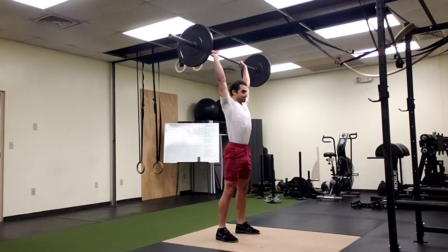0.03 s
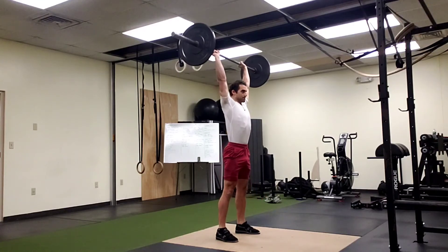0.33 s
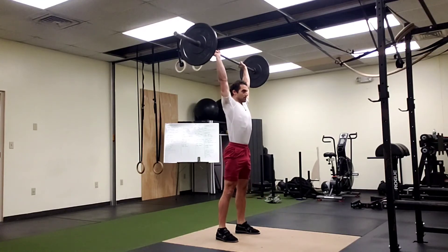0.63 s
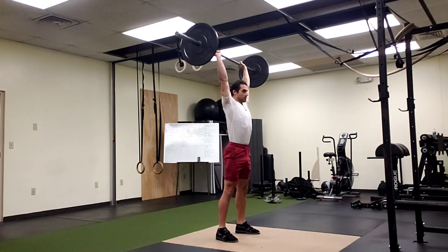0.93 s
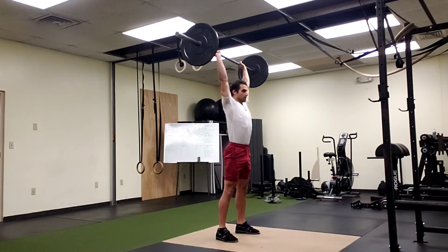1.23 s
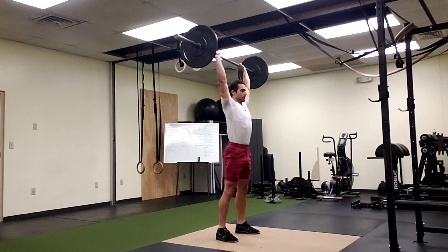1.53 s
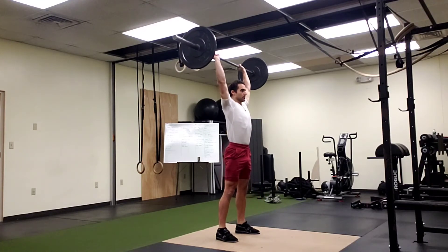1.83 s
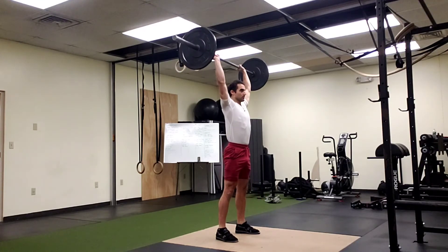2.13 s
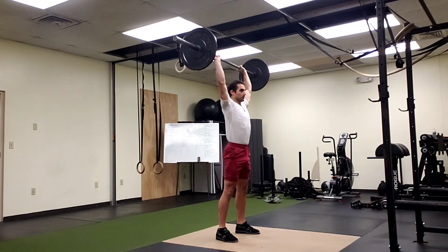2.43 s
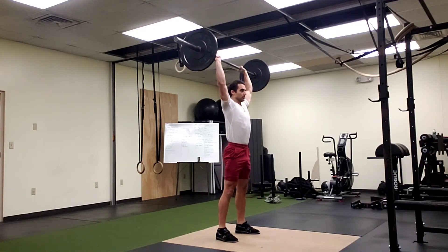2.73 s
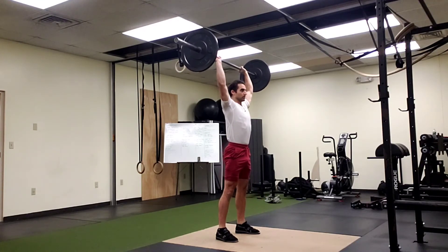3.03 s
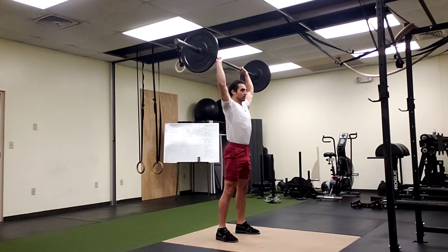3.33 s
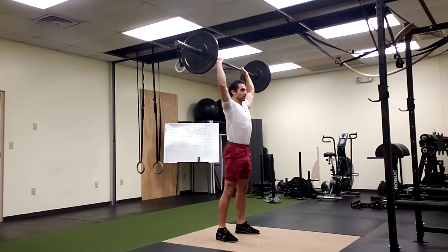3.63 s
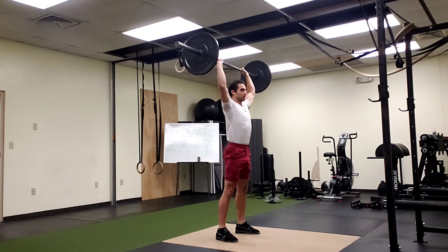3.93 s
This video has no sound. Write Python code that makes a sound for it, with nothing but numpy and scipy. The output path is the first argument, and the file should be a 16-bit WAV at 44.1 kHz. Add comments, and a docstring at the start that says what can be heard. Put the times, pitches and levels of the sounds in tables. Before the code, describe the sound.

A loaded barbell gives one sharp, rattling metal clang that echoes briefly around a gym. Quiet ventilation rumbles and hums throughout with faint microphone hiss, and a single electrical click comes late.

```python
"""In a gym, the plates of a barbell clash as it is locked overhead. They knock on the ends of the bar
a few times in quick succession, the steel rings, and the clang dies away in the room.
Air rumbles in the ventilation ducts and the fan hums throughout, over faint microphone hiss
and a thin sizzle on the left. Late on there is one dry electrical click."""
import sys
import numpy as np
from scipy import signal
from scipy.fft import rfft, irfft
from scipy.io import wavfile
from scipy.ndimage import uniform_filter1d

SR = 44100
rng = np.random.default_rng(int(sys.argv[2]) if len(sys.argv) > 2 else 0)


def unload_wav(signal):
    """Save mono or channel-first audio to the path in sys.argv[1] as 16-bit WAV at rate SR, clipped to [-1, 1]."""
    wavfile.write(
        sys.argv[1],
        SR,
        np.round(np.clip(np.atleast_2d(signal).T, -1, 1) * 32767).astype(np.int16),
    )


N = 176400  # 4 seconds

# plates knocking on the ends of the bar (time [s], level [dB], dull above [Hz])
KNOCKS = [(0.0, -46, 22000), (0.013, -54, 2000), (0.053, -54, 4830), (0.085, -58.5, 3000)]
# tone colour of the clattering plates (frequency [Hz], relative level [dB])
CLATTER_COLOUR = [(200, -1), (600, -2.5), (1100, .3), (1750, -3.2), (2150, 2.3), (3100, -1.5), (3950, 2.6),
                  (5050, -5.5), (5380, 4), (5800, -2), (7500, -3.5), (8600, -11), (9600, -3.5),
                  (11500, -1.5), (14500, -6.5)]
# which side the clang leans to (frequency [Hz], left minus right [dB])
CLANG_SIDE = [(600, 3), (2300, 1.4), (4200, -2), (5400, -2.5), (6500, 1), (8000, -8.5), (9600, 1.5),
              (12000, -.5), (14500, 0)]
# how long the gym echoes (frequency [Hz], time to fade by 60 dB [s])
GYM_ECHO = [(250, .6), (1000, 0.47), (2300, 0.62), (4000, 0.57), (6200, .68), (14000, 0.57)]
# ringing tones of the steel (frequency [Hz], relative level [dB], time to fade by 60 dB [s])
STEEL_TONES = [(1254, -13, .55), (1526, -15, .55), (2122, -10.5, .6), (2192, -13, .65), (2325, -10, .65),
               (2470, -13, .5), (3174, -14, .54), (3705, -10, .45), (3805, -14, .5), (3908, -10, .45),
               (4302, -12, .45), (5309, -1, .46), (5353, -7, .5), (5410, -4, .52), (5516, -8.5, .55),
               (7210, -16, .5)]
# tone colour of the moving air (frequency [Hz], relative level [dB])
AIR_COLOUR = [(15, -33), (28, -23.5), (38, -8.5), (48, -5.5), (58, -1.5), (68, -7), (84, -8.5),
              (100, -16.5), (150, -22.5), (185, -21), (250, -27.5), (380, -30), (460, -34.5), (530, -41),
              (660, -40.5), (850, -50), (1200, -54), (1900, -59), (2500, -58), (3200, -68), (5000, -73),
              (14000, -89.5)]
# how alike the air sounds in both ears (frequency [Hz], likeness [0-1])
AIR_LIKENESS = [(60, 1), (130, 0.94), (280, 0.85), (450, 0.66), (700, .45), (1300, 0.085), (4000, .1)]
# fan and motor tones (frequency [Hz], level [dB], waver [0-1])
FAN_TONES = [(59.22, -47.8, 0.56), (179.2, -66, .55), (419.2, -76, .65), (478.5, -82.5, .4), (931, -94, .7)]
# tone colour of the microphone hiss (frequency [Hz], relative level [dB])
HISS_COLOUR = [(500, 1), (1500, -1), (2500, 1.5), (3500, 0.5), (5000, -1), (7000, -4), (8000, -13),
               (8900, -12), (10000, -5), (11500, 0.5), (14500, 0)]
# how the sizzle comes and goes (time [s], level [dB])
SIZZLE_LEVELS = [(.5, -98), (.75, -87), (1.25, -87.5), (1.45, -96), (1.7, -87), (1.87, -91), (2.0, -86.5),
                 (2.45, -85.5), (2.55, -91), (2.7, -85), (2.85, -93), (3.18, -85), (3.3, -94), (3.48, -93),
                 (3.62, -83.5), (3.95, -96)]

VENT_PAN_DB = 1.6  # air and fan lean a little to the left


def amp(db):
    """Turns decibels into a number to multiply a sound by."""
    return 10 ** (np.asarray(db) / 20)


def unit(x):
    """Scales a signal to an average (rms) strength of 1."""
    return x / np.sqrt(np.mean(abs(x) ** 2) + 1e-20)


def read(table, hz):
    """Looks up a value between a table's rows, on a pitch-like (log) scale."""
    row_hz, value = np.transpose(table)
    return np.interp(np.log(hz + 1), np.log(row_hz + 1), value)


def pan(db):
    """Left and right gains that make the left louder by db."""
    return amp(np.array([[.5], [-.5]]) * db)


def add(mix, start_s, sound):
    """Adds a stereo sound to the mix at the given time."""
    part = mix[:, max(round(start_s * SR), 0):][:, :sound.shape[1]]
    part += sound[:, :part.shape[1]]


def drift(rate_hz):
    """A slow random wobble of strength 1, as complex numbers."""
    hz = np.fft.fftfreq(N, 1 / SR)
    keep_slow = np.exp(-.5 * (hz / rate_hz) ** 2)
    return unit(np.fft.ifft(np.fft.fft(rng.standard_normal(N)) * keep_slow))


def shaped_noise(gain):
    """Stereo noise, coloured by one gain for each frequency."""
    return unit(irfft(rfft(rng.standard_normal((2, N))) * gain, N))


def plate_knock(dull_hz, crack_db=-3, crack_fade_s=.011):
    """A plate makes contact with a short crack, then its clatter fades with the room's echo."""
    t = np.arange(SR) / SR
    hz, times, bands = signal.stft(rng.standard_normal((2, SR)), SR, nperseg=512)
    treble_cut = 1 / (1 + (hz / dull_hz) ** 4)
    bands *= (amp(read(CLATTER_COLOUR, hz)) * pan(read(CLANG_SIDE, hz)) * treble_cut)[:, :, None]
    steady = signal.istft(bands, SR)[1][:, :SR]
    fade = amp(-60 * times / read(GYM_ECHO, hz)[:, None])
    clatter = signal.istft(bands * fade, SR)[1][:, :SR] / steady.std()
    # reversed, so the crack's noise is unlike the clatter's
    crack = amp(crack_db) * unit(steady[:, ::-1]) * np.exp(-t / crack_fade_s)
    return crack + clatter


def steel_ring(gain_db=-10, flutter_depth=.5, flutter_hz=14):
    """Each knock feeds the steel's tones; reflections make them flutter differently in each ear."""
    t, out = np.arange(SR) / SR, np.zeros((2, SR))
    for hz, db, fade_s in STEEL_TONES:
        energy = sum((t >= start_s) * amp(knock_db + db - 60 * abs(t - start_s) / fade_s) ** 2
                     for start_s, knock_db, _ in KNOCKS)
        flutter = 1 + flutter_depth * drift(flutter_hz)[:2 * SR].reshape(2, SR)
        cycles = hz * t + rng.random() + rng.random((2, 1)) / 2
        tone = (flutter * np.exp(2j * np.pi * cycles)).real
        out += np.sqrt(energy) * pan(read(CLANG_SIDE, hz)) * tone
    return amp(gain_db) * out


def barbell():
    """The plates hit, then settle with weaker, duller knocks, and the steel rings on."""
    out = np.zeros((2, N))
    for start_s, db, dull_hz in KNOCKS:
        add(out, start_s, amp(db) * plate_knock(dull_hz))
    add(out, 0, steel_ring())
    return out


def ventilation(level_db=-45.5, patchy_db=1.0, swell_db=.5):
    """Air rumbles and rushes through ducts; its deep part is alike in both ears."""
    hz, _, bands = signal.stft(rng.standard_normal((2, N)), SR, nperseg=8192)
    likeness = read(AIR_LIKENESS, hz)[:, None]
    bands[0] = likeness * bands[1] + np.sqrt(1 - likeness ** 2) * bands[0]
    # neighbouring frequencies rise and dip together at random
    patches = unit(uniform_filter1d(rng.standard_normal(bands.shape[1:]), size=40, axis=0))
    bands *= amp(read(AIR_COLOUR, hz)[:, None] + patchy_db * patches)
    air = signal.istft(bands, SR)[1][:, :N]
    swell = amp(swell_db * drift(rate_hz=2).real)
    return amp(level_db) * pan(VENT_PAN_DB) * unit(air * swell)


def fan_hum(swell_at_s=1, swell_width_s=.052, swell_hz=420, swell_db=-64.5):
    """The fan and its motor hum with wavering tones; one tone stands out for a moment."""
    t, hum = np.arange(N) / SR, np.zeros(N)
    for hz, db, waver in FAN_TONES:
        wobble = 1 - waver + waver * drift(rate_hz=7)
        tone = np.exp(2j * np.pi * (hz * t + rng.random()))
        hum += amp(db) * unit((wobble * tone).real)
    swell = amp(swell_db) * np.exp(-.5 * ((t - swell_at_s) / swell_width_s) ** 2)
    hum += swell * unit(np.sin(2 * np.pi * swell_hz * t))
    return hum * pan(VENT_PAN_DB)


def microphone_hiss(level_db=-78.5):
    """The microphone makes a smooth, faint noise of its own."""
    hz = np.fft.rfftfreq(N, 1 / SR)
    return amp(level_db) * pan(db=2.5) * shaped_noise(amp(read(HISS_COLOUR, hz)))


def sizzle(centre_hz=6490, width_hz=360, flicker_db=2):
    """A narrow band of high hiss comes and goes in the left ear."""
    t, hz = np.arange(N) / SR, np.fft.rfftfreq(N, 1 / SR)
    noise = shaped_noise(np.exp(-.5 * ((hz - centre_hz) / width_hz) ** 2))[0]
    level_db = np.interp(t, *np.transpose(SIZZLE_LEVELS))
    level_db += flicker_db * unit(drift(rate_hz=9.1).real)
    return np.stack([noise * amp(level_db), np.zeros(N)])


def electrical_click(start_s=3.4233, level_db=-37, fade_s=.0015):
    """The signal jumps and falls straight back, with no room echo."""
    t, out = np.arange(SR // 20) / SR, np.zeros((2, N))
    add(out, start_s, -amp(level_db) * pan(db=1.3) * np.exp(-t / fade_s))
    return out


def scene():
    """The clang over the gym's steady background, and one late click."""
    return barbell() + ventilation() + fan_hum() + microphone_hiss() + sizzle() + electrical_click()


def record(dry):
    """Cuts away the highest treble, above 14540 Hz."""
    low_pass = signal.firwin(511, 14540, window=("kaiser", 9), fs=SR)
    return signal.oaconvolve(dry, low_pass[None], "same")


dry = scene()
out = record(dry)
unload_wav(out)
```